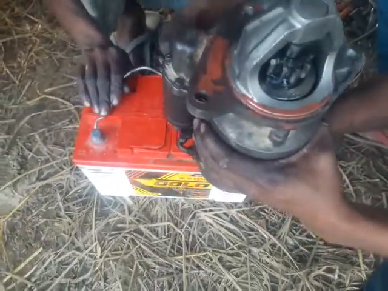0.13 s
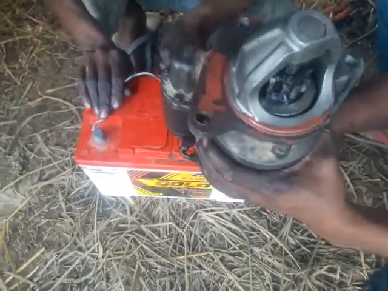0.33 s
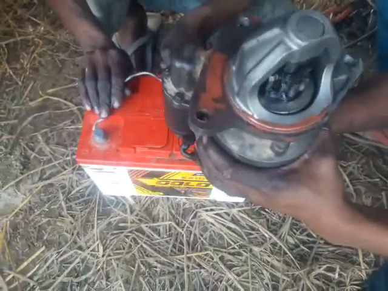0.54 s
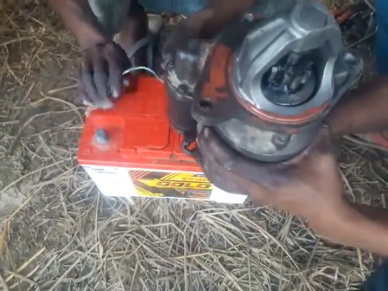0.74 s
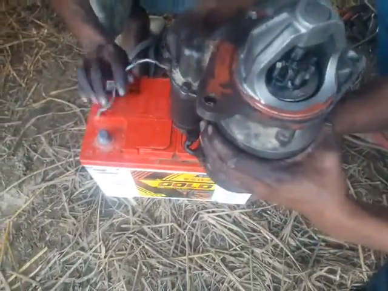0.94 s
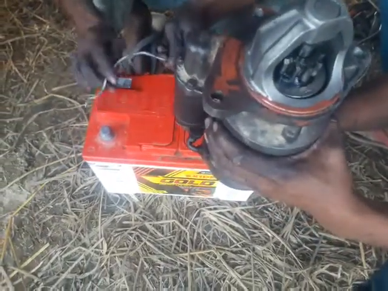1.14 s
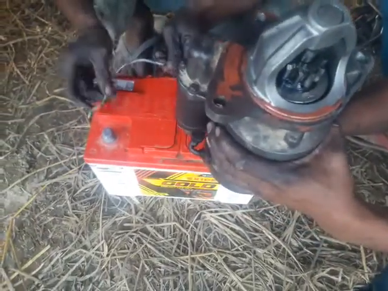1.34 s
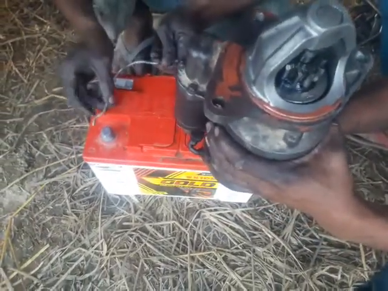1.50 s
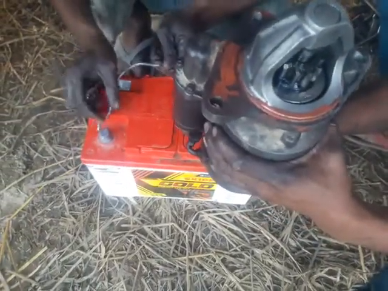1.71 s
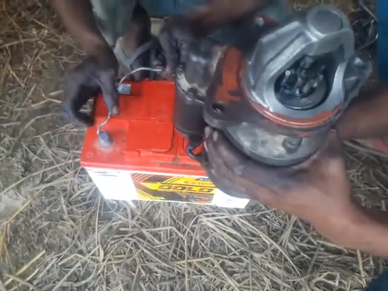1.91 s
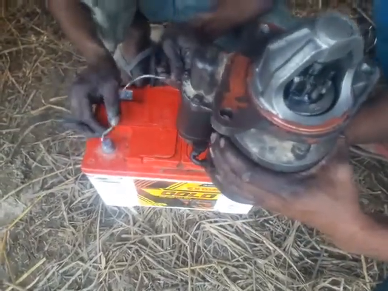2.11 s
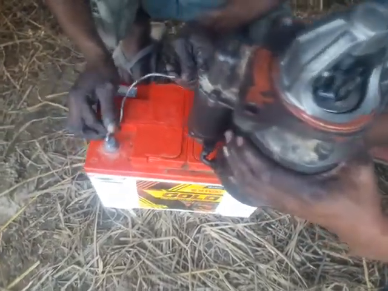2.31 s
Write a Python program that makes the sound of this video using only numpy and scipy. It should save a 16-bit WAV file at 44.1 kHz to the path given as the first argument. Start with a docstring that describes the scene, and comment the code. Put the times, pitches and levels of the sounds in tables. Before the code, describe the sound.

Close outdoor pickup of electric snaps from a wire on a battery post, a short cluster then a weaker second contact and tiny ticks, followed by near quiet with faint birds, handling rustle and closing hiss.

```python
"""Close outdoor pickup of a live wire tapped on a battery terminal to test a starter motor; birds call far off.
A chirp opens; from 0.2 s wire touches strike sizzling arcs (noise bursts) and ring metal (decaying modes).
Sparks snap (short pulses) from 0.29 s; later touches follow near 0.6 s, then the wire ticks and crackles off.
Birds (gliding sine tones) go on over the quiet yard, with a falling whistle at 1.45 s and chirps near 1.9 s.
A faint handling rustle rises again, and a soft hiss (coloured noise) swells at the end."""
import sys
import numpy as np
from scipy import signal
from scipy.fft import rfft, irfft
from scipy.io import wavfile
from scipy.ndimage import uniform_filter1d

SR = 44100
rng = np.random.default_rng(int(sys.argv[2]) if len(sys.argv) > 2 else 0)


def dump(signal):
    """Clip the signal to [-1, 1] and save it as 16-bit WAV at the path in sys.argv[1]."""
    limited = np.clip(np.atleast_2d(signal).T, -1, 1)
    pcm = np.round(limited * 32767).astype(np.int16)
    wavfile.write(sys.argv[1], SR, pcm)


N = 103635  # samples, 2.35 s

# Wire touches that strike an arc; ring_share is the ring length as a share of free ringing:
# start_s, burn_decay_s, arc_db, sizzle_db, low_ring_db, high_ring_db, wire_ping_db, ring_share
ARC_TOUCHES = [(.2231, .0045, -15.5, -30.5, -24, -23, -55, 1),
               (0.2283, 0.0061, -25.5, -25, -51, -38, -58.5, .8),
               (0.6195, 0.0028, -30.5, -26, -28, -58, -35.5, 0.48),
               (0.6455, 0.0015, -33, -44, -49.5, -70, -38, 0.44),
               (.7084, 0.0027, -46, -49, -80, -72, -65, .6)]
# Arc and sizzle colours: pitch_hz, relative_level_db
ARC_COLOUR = [(40, -32), (200, -27), (550, -6), (950, -7), (1150, 1.5), (1380, -7), (1700, -2.5),
              (2300, 0.5), (3200, -12.5), (5000, -16.5), (8000, -21.5), (16000, -29)]
SIZZLE_COLOUR = [(1500, -29.5), (3500, -15), (5000, -12), (6800, -6.5), (8100, -16), (9300, -6.5),
                 (11500, -8), (13000, -7), (14600, -2), (16200, -10.5)]
ARC_RISE_S, SPUTTER = 0.00024, 0.52  # sputter: log-amplitude spread of the noise grains

# Free ringing of the terminal and its clamp, low then high, and of the wire: pitch_hz, level_db, t60_s
LOW_RING_MODES = [(529.5, -3, 0.16), (1122, -7, .08), (1618, -7, .11), (2100, -20, 0.08)]
HIGH_RING_MODES = [(1172, -7, .1), (2191, 0, .18), (2290, -6, .12), (2385, -7, .1), (3835, -11, .08),
                   (9227, -15, .08), (11190, -10, .045), (13560, -12, .06)]
WIRE_PING_MODES = [(6530, -0.5, .05), (6920, -2, .06), (7250, -5.5, 0.05)]

# Single sparks: start_s, crack_db, sizzle_db
SPARK_EVENTS = [(0.2861, -3.5, -31.5), (0.3, -13.5, -29.5), (.3430, 0.5, -17.5), (0.5951, -15, -44.5)]
# Spectrum of a spark's crack: pitch_hz, level_db
CRACK_SPECTRUM = [(40, -23), (200, -5), (480, -3), (820, 7.5), (1200, 4), (1600, 14), (2450, 15),
                  (3200, 1.5), (4800, -12), (6400, -4.5), (8200, -13), (11000, -5), (15000, -3)]
SPARK_RISE_S, SPARK_DECAY_S = 0.00005, 0.0011

# Small ticks of the wire: start_s, knock_db, sizzle_db
WIRE_TICKS = [(0.402, -43.5, -62.5), (0.7511, -45.5, -61.5), (0.7666, -45, -68), (0.7933, -45, -85),
              (.8068, -39.5, -54), (0.8226, -44, -59.5), (0.8445, -63, -88), (0.8588, -54, -67.5),
              (0.866, -49, -79), (.8735, -57, -90), (0.8877, -63, -88), (0.943, -51.5, -88),
              (1.5020, -60.5, -90), (1.8000, -54, -90), (1.9928, -60.5, -90.5), (2.0535, -54.5, -82)]
# Colour of wire knocks, scrapes and crackle: pitch_hz, relative_level_db
KNOCK_COLOUR = [(80, -30), (500, -11), (1000, -9), (1550, 9.5), (2400, 1), (3400, -8.5), (5000, -42.5),
                (7000, -26.5), (9000, -35)]
TICK_RISE_S, TICK_DECAY_S = 0.00036, 0.0022

# Pushes of hand and wire on the battery: start_s, decay_s, hollow_knock_db, low_thud_db, scrape_db
BATTERY_BUMPS = [(0.2159, 0.014, -53.5, -66.5, -55.5), (.2220, 0.0054, -25.5, -43, -44),
                 (.4850, 0.0042, -91, -56, -89), (0.6115, 0.0023, -45, -62.5, -36),
                 (0.6174, 0.0044, -29.5, -47, -42), (.6440, 0.013, -62, -57, -51.5)]
# Hollow knock and low thud of the battery case: pitch_hz, relative_level_db
HOLLOW_COLOUR = [(60, -35), (300, -16.5), (470, 0.5), (560, -3), (690, -4), (900, -18.5), (3000, -34.5),
                 (8000, -53.5)]
THUD_COLOUR = [(30, -26), (100, -8), (190, 2), (320, -2.5), (500, -17.5), (1500, -39), (8000, -65.5)]
BUMP_RISE_S = 0.002

# Fine crackle while the wire drags off: time_s, level_db
DRAG_LEVEL = [(.68, -88), (.73, -59.5), (.8, -59), (.87, -62), (.95, -61.5), (1.02, -93)]
CRACKLE_PER_S, CRACKLE_SPREAD_DB = 230, 3  # mean click rate; standard deviation of click level

# Echoes from nearby surfaces: delay_s, gain
NEAR_ECHOES = [(.00105, .2), (.0029, .13), (.0112, .09), (0.0123, .06), (0.0139, .07)]
# Diffuse tail of the surroundings: pitch_hz, t60_s
TAIL_T60 = [(150, 0.04), (500, 0.17), (1800, 0.15), (4000, 0.1358), (9000, 0.1065), (15000, 0.05)]
# Strength of that tail: pitch_hz, level_db
TAIL_STRENGTH = [(150, -11), (500, -15), (2000, -15), (4500, -10.5), (9000, -9.5), (15000, -9)]
NEAR_DB, NEAR_DECAY_S, NEAR_DELAY_S, TAIL_DELAY_S = -11.5, 0.004, 0.001, 0.0105

# Far bird notes: start_s, length_s, level_db, start_hz, middle_hz, end_hz
BIRD_NOTES = [(0.107, 0.03, -67.5, 2690, 2660, 2570), (0.133, 0.032, -68, 2650, 2340, 2480),
              (0.182, 0.031, -65, 2760, 2740, 2450), (.515, .05, -75.5, 2710, 2896, 2940),
              (1.037, .026, -71, 2548, 2645, 2800), (1.062, .03, -69.5, 2580, 2321, 2450),
              (1.118, .03, -68.5, 2897, 2707, 2430), (1.135, 0.029, -75.5, 3300, 3260, 3200),
              (1.322, 0.02, -69, 2858, 2574, 2560), (1.34, 0.04, -66.5, 2537, 2510, 2460),
              (1.89, 0.021, -70.5, 2255, 2242, 2410), (1.92, 0.024, -58.5, 2950, 2254, 2920),
              (1.949, 0.026, -54.5, 2906, 2200, 3013)]
# One long falling whistle: time_s, level_db
WHISTLE_LEVEL = [(1.45, -84), (1.48, -72), (1.506, -67), (1.525, -58.5), (1.535, -67), (1.548, -55),
                 (1.566, -56), (1.587, -76.5), (1.601, -54), (1.621, -71.5), (1.63, -90)]
WHISTLE_TOP_HZ, WHISTLE_END_HZ, WHISTLE_FALL_S, WHISTLE_CURVE = 4374, 2502, 0.05, 1.25
# Rms pitch deviation as a share of pitch: small in clear notes, large in faint smeared ones
BIRD_WAVER, BIRD_SMEAR, CLEAR_DB, SMEARED_DB = 0.007, 0.045, -61, -70
# Scatter of birdsong from the trees: pitch_hz, t60_s
TREE_T60 = [(2400, 0.36), (3000, 0.35)]
# Strength of that scatter: pitch_hz, level_db
TREE_STRENGTH = [(2500, -10), (3000, -7)]
BIRD_ECHO_S = 0.02

# Colours of yard air, handling rustle and closing hiss: pitch_hz, relative_level_db
YARD_COLOUR = [(20, -5.5), (50, -4.5), (90, 1), (200, -5.5), (400, -8.5), (800, -15), (1600, -15),
               (2600, -9), (3600, -25.5), (5000, -28.5), (8000, -35.5), (14500, -26.5), (16000, -33.5)]
RUSTLE_COLOUR = [(30, -17), (100, 5.5), (250, 2), (700, 0.5), (1700, -3), (3500, -9.5), (5000, -21.5),
                 (8000, -33), (15000, -27.5)]
HISS_COLOUR = [(200, -10), (900, -5.5), (1800, 7.5), (2700, 1), (4000, -11.5), (6500, -14.5), (8200, -24),
               (11500, -12), (14800, -2.5), (16000, -12)]
# Their levels: time_s, level_db
YARD_CURVE = [(0, -82), (.3, -69), (.8, -75), (1.1, -77), (1.4, -79), (1.7, -74), (2.0, -74), (2.35, -74.5)]
RUSTLE_CURVE = [(0, -93), (.4, -75.5), (.52, -77.5), (.68, -75.5), (.79, -76.5), (.95, -82), (1.35, -93),
                (1.75, -77.5), (2.0, -71), (2.17, -69), (2.25, -70), (2.35, -70)]
HISS_CURVE = [(2.2, -100), (2.26, -74.5), (2.295, -64), (2.33, -59), (2.35, -63)]
EDGE_HZ = 16400  # upper edge of the recorder's band


def amp(db):
    """Decibels to gain."""
    return 10 ** (np.asarray(db) / 20)


def unit(x):
    """Scales to rms 1."""
    return x / np.sqrt(np.mean(x ** 2) + 1e-20)


def read(points, hz):
    """Reads a table on a log-frequency axis."""
    f, value = np.transpose(points)
    return np.interp(np.log(hz + 1), np.log(f + 1), value)


def level(points):
    """Gain over the whole scene from a level curve."""
    t = np.arange(N) / SR
    return amp(np.interp(t, *np.transpose(points)))


def add(mix, start_s, sound):
    """Adds a sound to the mix at a given time, cut at the end of the mix."""
    part = mix[max(round(start_s * SR), 0):][:len(sound)]
    part += sound[:len(part)]


def pulse(points, size=2048):
    """The most compact causal (minimum-phase) pulse with a given spectrum."""
    hz = abs(np.fft.fftfreq(size, 1 / SR))
    log_gain = np.log(amp(read(points, hz)))
    spectrum = np.exp(np.conj(signal.hilbert(log_gain)))
    return np.fft.ifft(spectrum).real[:size // 2]


def noise(colour):
    """Steady noise of a given colour, rms 1."""
    gain = amp(read(colour, np.fft.rfftfreq(N, 1 / SR)))
    return unit(irfft(rfft(rng.standard_normal(N)) * gain, N))


def burst(colour, rise_s, decay_s, size=4096):
    """Coloured, sputtering noise that rises fast and dies away exponentially."""
    t = np.arange(size) / SR
    shape = (1 - np.exp(-t / rise_s)) * np.exp(-t / decay_s)
    grains = rng.standard_normal(size) * np.exp(SPUTTER * rng.standard_normal(size))
    sound = signal.fftconvolve(grains * shape, pulse(colour))
    # The energy depends only on the envelope, whatever the colour
    return sound * np.linalg.norm(shape) / np.linalg.norm(sound)


def diffuse(x, t60s, levels, size, order):
    """Diffuse reflections: fresh noise that follows the power of x and dies away band by band."""
    hop = size // 4
    pair = np.stack([x, rng.standard_normal(N)])
    hz, _, (source, fresh) = signal.stft(pair, SR, nperseg=size, noverlap=size - hop)
    power = uniform_filter1d(abs(source) ** 2, order, axis=0)
    # Share of power kept from one hop to the next
    keep = np.exp(-2 * np.log(1000) * hop / SR / read(t60s, hz))
    lingering = np.array([signal.lfilter([1 - k], [1, -k], p) for k, p in zip(keep, power)])
    field = fresh / fresh.std() * np.sqrt(abs(lingering))
    field = field * amp(read(levels, hz))[:, None]
    return signal.istft(field, SR, nperseg=size, noverlap=size - hop)[1][:N]


def touches():
    """The wire meets the terminal: an arc sizzles and dies within milliseconds."""
    out = np.zeros(N)
    for start_s, burn_s, arc_db, sizzle_db, *_ in ARC_TOUCHES:
        add(out, start_s, amp(arc_db) * burst(ARC_COLOUR, ARC_RISE_S, burn_s))
        add(out, start_s, amp(sizzle_db) * burst(SIZZLE_COLOUR, ARC_RISE_S, burn_s))
    return out


def sparks():
    """Each spark is one pressure pulse with a millisecond of sizzle."""
    out = np.zeros(N)
    for start_s, crack_db, sizzle_db in SPARK_EVENTS:
        add(out, start_s, amp(crack_db) * pulse(CRACK_SPECTRUM))
        add(out, start_s, amp(sizzle_db) * burst(SIZZLE_COLOUR, SPARK_RISE_S, SPARK_DECAY_S))
    return out


def ring(modes, share, size=12000):
    """Decaying modes of struck metal; a wire held down shortens them."""
    t = np.arange(size) / SR
    out = np.zeros(size)
    for hz, db, t60 in modes:
        decay = amp(db - 60 * t / (t60 * share))
        out += decay * rng.choice([-1, 1]) * np.cos(2 * np.pi * hz * t)
    return out


def metal():
    """Terminal, clamp and wire ring on after each touch."""
    out = np.zeros(N)
    for start_s, *_, low_db, high_db, ping_db, share in ARC_TOUCHES:
        add(out, start_s, amp(low_db) * ring(LOW_RING_MODES, share))
        add(out, start_s, amp(high_db) * ring(HIGH_RING_MODES, share))
        add(out, start_s, amp(ping_db) * ring(WIRE_PING_MODES, share))
    return out


def ticks():
    """The loose wire knocks lightly, sometimes with a trace of sizzle."""
    out = np.zeros(N)
    for start_s, knock_db, sizzle_db in WIRE_TICKS:
        add(out, start_s, amp(knock_db) * burst(KNOCK_COLOUR, TICK_RISE_S, TICK_DECAY_S))
        add(out, start_s, amp(sizzle_db) * burst(SIZZLE_COLOUR, TICK_RISE_S, TICK_DECAY_S))
    return out


def bumps():
    """The battery case answers each push with a dull knock as the wire scrapes into place."""
    out = np.zeros(N)
    for start_s, decay_s, knock_db, thud_db, scrape_db in BATTERY_BUMPS:
        add(out, start_s, amp(knock_db) * burst(HOLLOW_COLOUR, BUMP_RISE_S, decay_s))
        add(out, start_s, amp(thud_db) * burst(THUD_COLOUR, BUMP_RISE_S, decay_s))
        add(out, start_s, amp(scrape_db) * burst(KNOCK_COLOUR, BUMP_RISE_S, decay_s))
    return out


def crackle():
    """Wire strands drag over the terminal in tiny random clicks."""
    happens = rng.random(N) < CRACKLE_PER_S / SR
    clicks = happens * amp(CRACKLE_SPREAD_DB * rng.standard_normal(N))
    t = np.arange(N) / SR
    dragging = (t > DRAG_LEVEL[0][0]) & (t < DRAG_LEVEL[-1][0])
    click = pulse(KNOCK_COLOUR)
    click = click / abs(click).max()
    return signal.fftconvolve(clicks * dragging * level(DRAG_LEVEL), click)[:N]


def surroundings(x, size=2048):
    """Motor, battery and ground throw back quick echoes and a short tail."""
    echoes = np.zeros(size)
    for delay_s, gain in NEAR_ECHOES:
        add(echoes, delay_s, np.array([gain]))
    t = np.arange(size) / SR
    near = rng.choice([-1., 1.], size) * np.exp(-t / NEAR_DECAY_S)
    add(echoes, NEAR_DELAY_S, amp(NEAR_DB) * near / np.linalg.norm(near))
    out = x + signal.fftconvolve(x, echoes)[:N]
    add(out, TAIL_DELAY_S, diffuse(x, TAIL_T60, TAIL_STRENGTH, size=256, order=3))
    return out


def tone(hz, db, size=16384):
    """A bird tone at a given level; the fainter it is, the more its pitch is smeared."""
    waver = unit(uniform_filter1d(rng.standard_normal(size), size=60))[:len(hz)]
    depth = np.interp(db, [SMEARED_DB, CLEAR_DB], [BIRD_SMEAR, BIRD_WAVER])
    phase = 2 * np.pi * np.cumsum(hz * (1 + depth * waver)) / SR
    return amp(db) * np.sqrt(2) * np.sin(phase)


def chirps():
    """Short far bird notes: each glides through three pitches under a rounded envelope."""
    out = np.zeros(N)
    for start_s, length_s, db, start_hz, middle_hz, end_hz in BIRD_NOTES:
        u = np.linspace(0, 1, int(length_s * SR))
        glide = np.polyfit([0, .5, 1], [start_hz, middle_hz, end_hz], 2)
        add(out, start_s, 2 * np.sqrt(u * (1 - u)) * tone(np.polyval(glide, u), db))
    return out


def whistle():
    """One long bird whistle whose pitch falls and levels out as its loudness comes and goes."""
    out = np.zeros(N)
    start_s = WHISTLE_LEVEL[0][0]
    t = np.arange(0, WHISTLE_LEVEL[-1][0] - start_s, 1 / SR)
    fall = np.exp(-(t / WHISTLE_FALL_S) ** WHISTLE_CURVE)
    hz = WHISTLE_END_HZ + (WHISTLE_TOP_HZ - WHISTLE_END_HZ) * fall
    db = np.interp(start_s + t, *np.transpose(WHISTLE_LEVEL))
    add(out, start_s, tone(hz, db))
    return out


def birds():
    """Distant chirps and one falling whistle, scattered by the trees."""
    out = chirps() + whistle()
    add(out, BIRD_ECHO_S, diffuse(out, TREE_T60, TREE_STRENGTH, size=512, order=3))
    return out


def yard_air():
    """Quiet outdoor air: coloured noise that drifts in level."""
    return level(YARD_CURVE) * noise(YARD_COLOUR)


def rustle():
    """Faint rustle of handling: low and middle noise that comes and goes."""
    return level(RUSTLE_CURVE) * noise(RUSTLE_COLOUR)


def hiss():
    """Soft noise that swells at the end."""
    return level(HISS_CURVE) * noise(HISS_COLOUR)


def scene():
    """Wire and battery close to the microphone, birds and air behind."""
    air = yard_air() + rustle() + hiss()
    contact = touches() + sparks() + ticks() + bumps() + crackle()
    near = surroundings(contact) + metal()
    return (air + near + birds())[None]


def record(dry):
    """The recorder's band limit: a linear-phase low-pass."""
    low_pass = signal.firwin(201, EDGE_HZ, window=("kaiser", 8), fs=SR)
    return signal.oaconvolve(dry, low_pass[None], "same")


dry = scene()
out = record(dry)
dump(out)
```